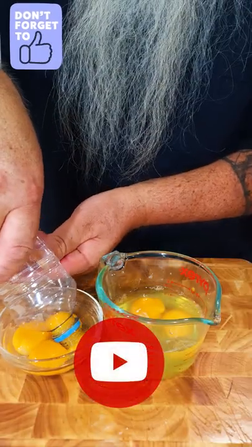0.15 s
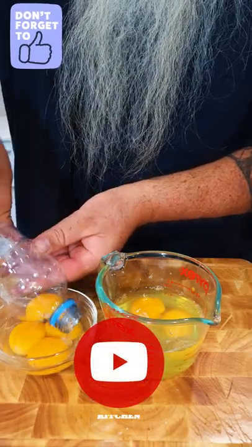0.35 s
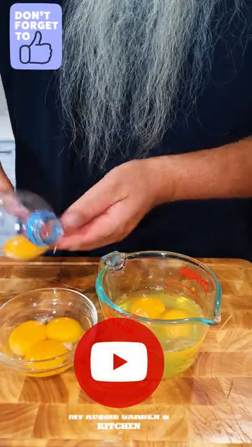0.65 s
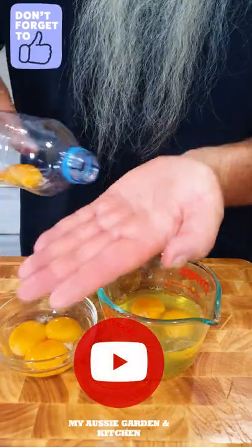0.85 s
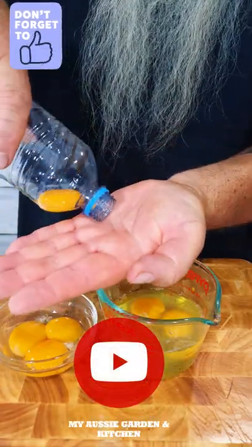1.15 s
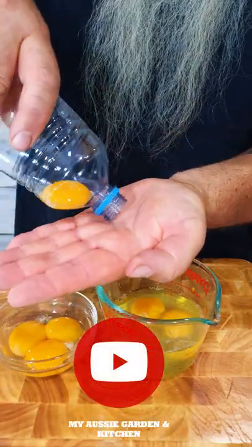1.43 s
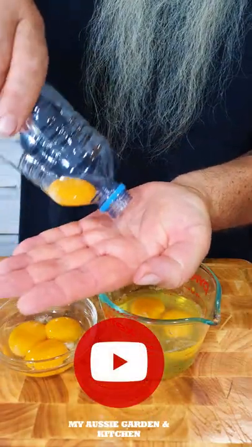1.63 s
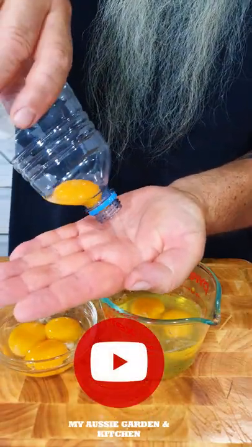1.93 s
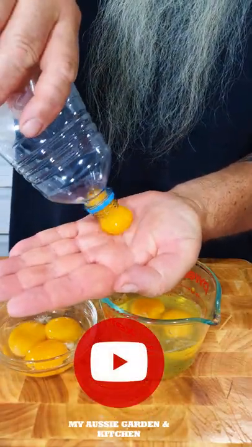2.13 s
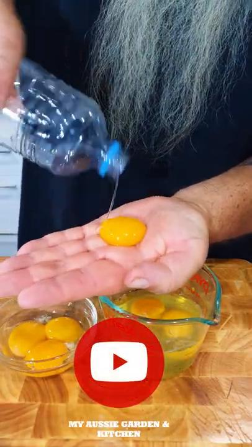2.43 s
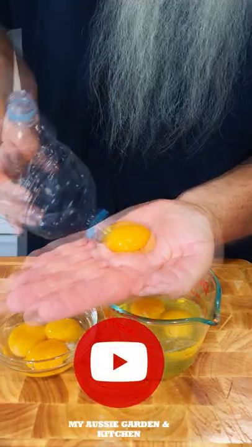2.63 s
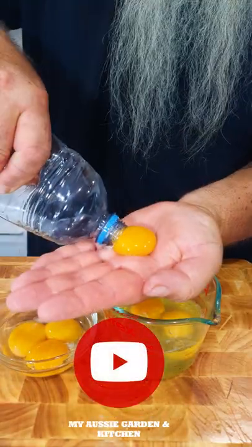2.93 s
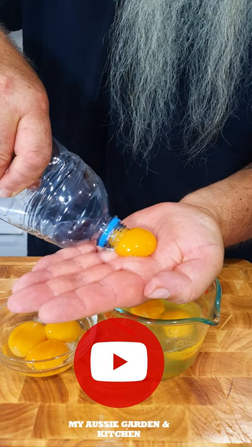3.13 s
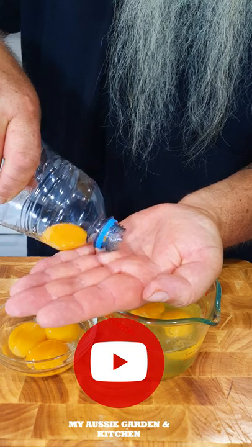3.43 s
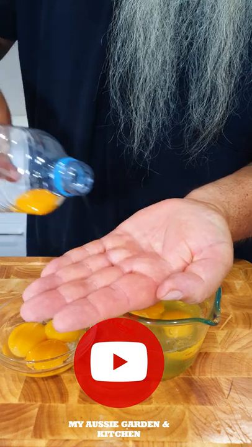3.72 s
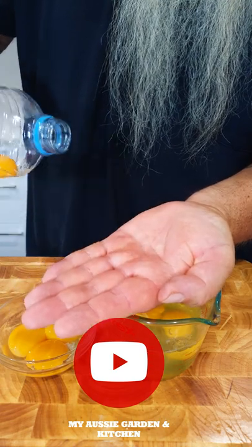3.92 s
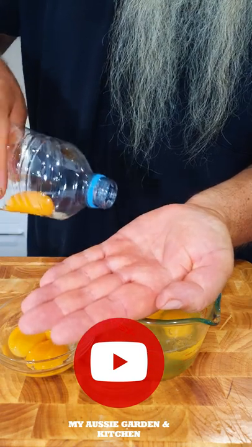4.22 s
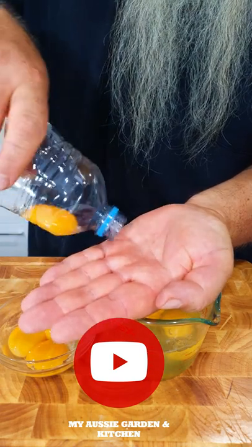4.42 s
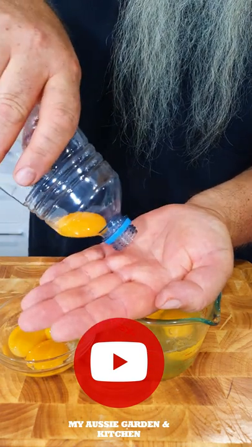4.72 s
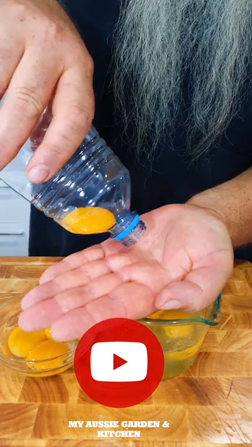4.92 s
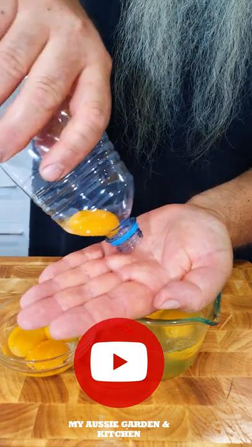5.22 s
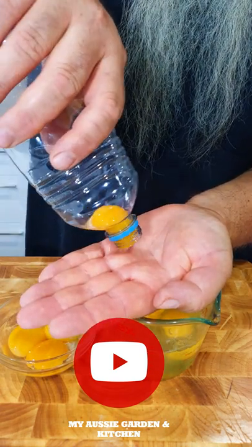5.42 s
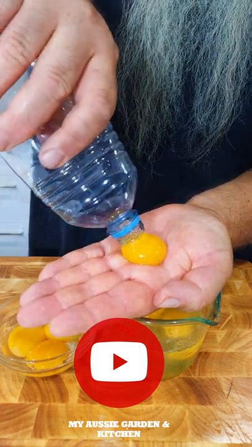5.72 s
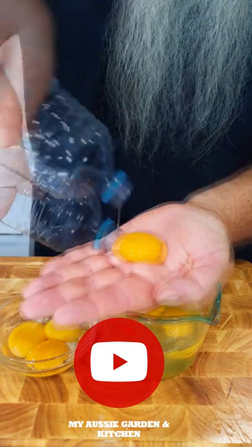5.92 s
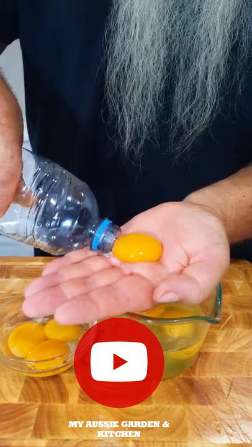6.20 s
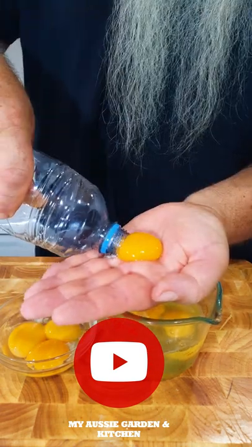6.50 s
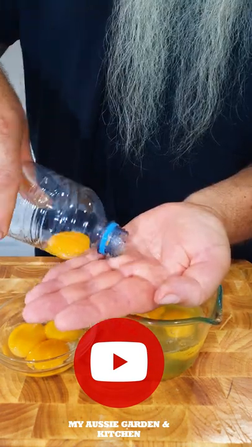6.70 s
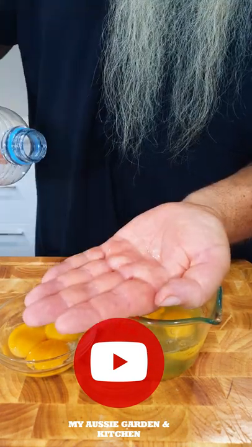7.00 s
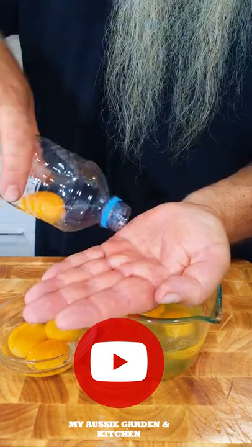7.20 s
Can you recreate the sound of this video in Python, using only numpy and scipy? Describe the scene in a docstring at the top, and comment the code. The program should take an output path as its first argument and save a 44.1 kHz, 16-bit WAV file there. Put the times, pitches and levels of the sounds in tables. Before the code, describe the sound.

A small, thin plastic bottle is squeezed and released close to the microphone in a kitchen with short, bright echoes. After a nearly quiet start, a tight flurry of sharp cracks and hollow plastic pops runs from 0.15 to 0.5 seconds. Another group snaps at 1.2 to 1.55, then lighter, brittle clicks at 2.0 to 2.45. From 3.15 to 3.55 the wall rustles and crackles strongly, with soft low thuds. A single loud hollow pop with a low boom lands at 4.15, followed by weaker knocks around 4.35. Only faint ticks at 5.2 and 5.65 break the pause. A thin, bright crinkle comes at 5.9 to 6.2, then a final rapid cluster of dry snaps at 6.65 to 6.77. Faint, wavering hum and soft hush continue throughout, dipping slightly in pitch around 2.6 and jumping higher after 5.9, where echoes become shorter.

```python
"""Thin plastic bottle in a small kitchen

A bottle is squeezed and let go; each buckle snaps a crease and rings a panel, the whole wall and the air inside.
The microphone hears it direct, with the room's noise-like echoes 5.5 to 6.5 dB behind what is sent to them.
Creeping wall adds rustle and ticks, contents and air add thuds. Behind lie a wavering hum and filtered-noise
hush. Twice the pitch of hum, hush and bottle modes steps, and the room's decay with it."""
import sys
import numpy as np
from scipy import signal
from scipy.fft import rfft, irfft
from scipy.io import wavfile
from scipy.ndimage import uniform_filter1d

SR = 44100
rng = np.random.default_rng(int(sys.argv[2]) if len(sys.argv) > 2 else 0)


def unload_wav(signal):
    """Save mono or channel-first audio to the path in sys.argv[1] as 16-bit WAV at rate SR, clipped to [-1, 1]."""
    wavfile.write(
        sys.argv[1],
        SR,
        np.round(np.clip(np.atleast_2d(signal).T, -1, 1) * 32767).astype(np.int16),
    )


N = 324135

# Steady hum of the place. Each row: partial in Hz at pitch factor 1, level in dB rms.
HUM_PARTIALS = [(113, -72.5), (189, -71.5), (382, -78), (444, -76.5), (473, -67.5), (571, -77.5),
                (1325, -83)]
# Level of the room's hush over time. Each row: time in seconds, level in dB rms.
HUSH_LEVEL = [(0, -58), (1.0, -63.5), (1.45, -57.5), (2.3, -61.5), (2.9, -63), (3.7, -56), (4.5, -62),
              (5.1, -57.5), (5.8, -61), (6.6, -62), (7.35, -60.5)]
# Spectrum of the hush. Each row: frequency in Hz at pitch factor 1, relative density in dB per Hz.
HUSH_SPECTRUM = [(28, -34), (42, -28), (57, 0), (110, -2.5), (280, -3.5), (520, -4.5), (950, -12.5),
                 (2400, -23.5), (4400, -27), (5800, -35), (15000, -31)]
# Stretches of the take. Each row: start in seconds, room level in dB, factor on the echo times, bend of decay.
STRETCHES = [(0, -5.5, 1.14, 0.9), (2.618, -6.5, 1.16, 1.3), (5.878, -6, 0.57, 1.76)]
# Pitch of hum, hush and bottle modes. Each entry: the factor in one stretch.
PITCH_FACTORS = [1.103, 1, 1.776]
# Buckles of the wall. Each row: time in seconds, panel pitch in Hz, then relative levels in dB of
# crease snap, wall and air thump.
BUCKLES = [(0.1606, 715, -77, -55.5, -41), (0.2652, 3480, -35, -37, -20), (0.2715, 1426, -17.5, -13.5, -46),
           (0.2805, 1480, -47, -28, -22), (0.313, 2100, -34.5, -29.5, -32),
           (0.3982, 1380, -15.5, -12.5, -35), (0.4049, 8400, -14, -14, -49),
           (0.439, 3020, -21.5, -24.5, -37), (0.4559, 8700, -3.5, -8, -18.5), (0.464, 4800, -20, -12, -47),
           (0.4804, 8280, -16, -21.5, -47.5), (1.2124, 1004, -53, -28, -24.5), (1.255, 2155, -41, -29, -31),
           (1.3077, 2130, -28.5, -28, -21), (1.3113, 4110, -18, -24, -18), (1.5019, 302, -28.5, -30, -17),
           (1.5319, 9090, -7, -43, -33), (1.5413, 5970, -16, -14.5, -26), (2.0198, 390, -64, -46.5, -38),
           (2.0378, 1600, -56.5, -48, -32.5), (2.0521, 885, -63, -35, -28.5),
           (2.059, 5270, -18, -14.5, -21.5), (2.0687, 900, -26, -22.5, -29), (2.1133, 8740, -9.5, -15, -26),
           (2.2192, 496, -63, -40.5, -50.5), (2.42, 882, -46.5, -26, -57.5), (2.433, 9120, -7.5, -10, -40),
           (2.4474, 6200, -17.5, -35, -29.5), (2.54, 2420, -44.5, -51, -61),
           (2.6019, 2100, -53.5, -60.5, -58.5), (3.1543, 8980, -42.5, -54.5, -52),
           (3.1661, 2050, -10, -17, -39), (3.3286, 700, -42, -31, -38), (3.346, 1040, -44, -30.5, -34),
           (3.3515, 3656, -34, -24, -42), (3.3628, 6800, -14.5, -27, -27), (3.39, 3550, -11.5, -16, -20),
           (3.4628, 4020, -11, -14.5, -33), (3.525, 280, -47, -28.5, -41),
           (3.5332, 2070, -37.5, -22.5, -25), (3.5668, 770, -46.5, -37.5, -43.5),
           (4.1483, 1260, -7.5, -8.5, -18.5), (4.3392, 2550, -40, -30.5, -28.5),
           (4.375, 521.6, -43.5, -30.5, -32.5), (5.2134, 1460, -42, -33, -39),
           (5.6467, 3110, -53, -42, -41), (5.819, 300, -70.5, -60.5, -39.5), (5.9083, 1380, -46, -37, -44),
           (5.9137, 1213, -28, -20, -50), (5.9164, 4400, -18.5, -21, -36), (5.9593, 3830, -25, -21.5, -45),
           (5.9854, 3360, -17, -33, -48), (6.0528, 5700, -14, -57, -50), (6.1001, 3830, -31, -41, -54),
           (6.108, 1420, -54, -31, -59), (6.1183, 4000, -19.5, -23, -57), (6.1449, 4270, -37, -29, -39),
           (6.2137, 4276, -29.5, -45.5, -36), (6.657, 1430, -24, -14.5, -27),
           (6.6727, 9000, -31.5, -43, -38), (6.6873, 1050, -16.5, -21, -24), (6.689, 7050, -17.5, -28, -32),
           (6.7073, 4350, -12, -33, -50), (6.7161, 6240, -12.5, -23, -17), (6.7337, 3400, -11, -16.5, -51),
           (6.7383, 3260, -9.5, -32.5, -42.5), (6.7444, 1400, -25.5, -23, -50.5),
           (6.7634, 3270, -19, -51.5, -52)]
# Spectrum of a crease. Each row: frequency in Hz, relative density in dB per Hz.
CREASE_SPECTRUM = [(1800, -6.5), (3500, -0.9), (6000, -1.5), (9000, -3.5), (12000, -4), (15500, -10)]
# The wall flexing, at pitch factor 1. Each row: mode in Hz, relative level in dB, 60 dB decay in seconds.
WALL_MODES = [(670, -4.5, 0.014), (820, -2, 0.022), (930, -3, 0.0096), (1140, -5.5, 0.023),
              (1380, -1.26, 0.0064), (1480, -0.5, 0.014), (1684.5, -4.5, 0.014), (2120, 3, 0.0074),
              (2410, -3, 0.01), (3000, -6, 0.0037), (4300, -6, 0.0066)]
# Air in the bottle and its neck, at pitch factor 1. Each row: mode in Hz, relative level in dB,
# 60 dB decay in seconds.
AIR_MODES = [(125, -14, 0.011), (246, -5.5, 0.039), (326, -4, 0.036), (420, -2, 0.033), (520, 4, 0.031)]
# Colour of the room's answer. Each row: frequency in Hz, relative level in dB.
ECHO_COLOUR = [(100, -11), (300, -6.5), (1000, 2.5), (3000, 3), (8000, 1), (15000, 1.5)]
# Echo times before the stretch's factor. Each row: frequency in Hz, 60 dB decay in seconds.
ECHO_T60 = [(150, 0.9), (500, .24), (2000, 0.18), (6000, 0.19), (15000, 0.17)]
# The wall creeps before it gives. Each row: moment it gives in seconds, rustle just before in dB rms,
# rise in dB per second.
CREEPS = [(3.36, -32, 329.5), (6.052, -48, 599.5)]
# Soft low knocks of the contents and booms of the enclosed air. Each row: time in seconds, pitch in Hz,
# level in dB before the band-pass, 60 dB decay in seconds.
THUDS = [(3.35, 100, -27, 0.039), (3.528, 148, -34.5, 0.1), (4.149, 318, -25, 0.2), (4.149, 252, -27, 0.17),
         (4.339, 282, -37, 0.081), (4.375, 319, -26, 0.085)]

PANEL_T60_S = 0.008   # for a 1 kHz panel; higher panels die sooner
PANEL_DB = 4.5   # panel peak over the stronger of the crease and wall entries
PANEL_TO_ROOM_DB = -4.5
WALL_FOCUS_DB, CREASE_FOCUS_DB = 2.5, 2   # fall per octave away from the panel's pitch
RADIATE_HZ, CUTOFF_HZ = 170, 17000
TICK_DB, TICK_SPREAD_DB, TICK_LEAD_S = 5, 2, 0.11   # over the rustle, either way, earliest before giving


def amp(db):
    """Decibels to gain."""
    return 10 ** (np.asarray(db) / 20)


def at_hz(points, hz):
    """Reads (Hz, value) points on a log-frequency axis."""
    f, v = np.transpose(points)
    return np.interp(np.log(np.maximum(hz, 1)), np.log(f), v)


def in_time(rows):
    """Turns a (seconds, dB) curve into a gain per sample."""
    s, db = np.transpose(rows)
    return amp(np.interp(np.arange(N) / SR, s, db, left=-120, right=db[-1]))


def coloured(spectrum, size):
    """Noise with the given spectrum, rms 1."""
    hz = np.arange(size // 2 + 1) * SR / size
    white = rfft(rng.standard_normal(size))
    noise = irfft(white * amp(at_hz(spectrum, hz)), size)
    return noise / noise.std()


def hum(pitch, waver_hz=2.5):
    """Steady partials of constant level, each wandering a little in frequency."""
    t, out = np.arange(N) / SR, 0
    for hz, db in HUM_PARTIALS:
        waver = np.interp(t * 40, np.arange(300), rng.standard_normal(300))   # 40 new values a second
        phase = 2 * np.pi * np.cumsum(pitch * hz + waver_hz * waver) / SR
        out = out + amp(db) * np.sqrt(2) * np.sin(phase)
    return out


def hush(pitch):
    """Background noise whose whole spectrum moves with the pitch factor and whose level drifts."""
    spectrum = [(pitch * hz, db) for hz, db in HUSH_SPECTRUM]
    return in_time(HUSH_LEVEL) * coloured(spectrum, N)


def ring(x, hz, t60):
    """A damped resonance: a unit click sets a sine of height 1 ringing."""
    r, w = amp(-60 / (t60 * SR)), 2 * np.pi * hz / SR
    return signal.lfilter([0, np.sin(w)], [1, -2 * r * np.cos(w), r * r], x + 1e-18)


def burst(fall, near_hz):
    """Noise under a fall, broad colour evened to a crease's near a panel; same energy as the fall."""
    spectrum = rfft(rng.standard_normal(len(fall)) * fall)
    broad = np.sqrt(uniform_filter1d(np.abs(spectrum) ** 2, size=25))
    hz = np.maximum(np.arange(len(spectrum)), 1) * SR / len(fall)
    colour_db = at_hz(CREASE_SPECTRUM, hz) - CREASE_FOCUS_DB * np.abs(np.log2(hz / near_hz))
    noise = irfft(spectrum / broad * amp(colour_db), len(fall))
    return noise * np.sqrt(np.sum(fall ** 2) / np.sum(noise ** 2))


def snaps(buckles, snap_s=0.00041, after_db=-14, after_s=0.0045):
    """A crease gives a very short bright burst and a weaker crackle; the panel beside it rings."""
    size, lead = 2048, 256   # samples; the lead leaves room for a steep fade-in
    creases, panels, t = np.zeros(N + size), np.zeros(N + size), np.arange(size) / SR
    late = np.maximum(t - lead / SR, 0)
    snap, crackle = np.exp(-late / snap_s), amp(after_db) * np.exp(-late / after_s)
    fall = (t >= lead / SR) * (snap + crackle)
    edge = np.clip(t * SR / lead, 0, 1) ** 24
    for s, panel_hz, crease_db, wall_db, _ in buckles:
        # the panel flips over in half a cycle
        push = np.sin(np.pi * np.clip(late * panel_hz * 2, 0, 1)) ** 2
        panel_t60 = PANEL_T60_S / np.sqrt(panel_hz / 1000)
        panel = ring(push * rng.choice([-1, 1]), panel_hz, panel_t60)
        panel_gain = amp(max(crease_db, wall_db) + PANEL_DB)
        at = int(s * SR) - lead
        creases[at:at + size] += amp(crease_db + 4.0) * burst(fall, panel_hz) * edge
        panels[at:at + size] += panel_gain * panel / np.abs(panel).max()
    return creases[:N], panels[:N]


def body(start, near_hz, modes, level_db, focus_db, spread_db, smear_s, soft_hz):
    """Each buckle strikes every mode, varied in strength and delay, less by focus_db per octave off its pitch."""
    out = np.zeros(N)
    direction = rng.choice([-1, 1], len(start))
    for k, (hz, db, t60) in enumerate(modes):
        draw, clicks = rng.standard_normal((len(start), 2)), np.zeros(N)
        at = ((start + smear_s * np.abs(draw[:, 0])) * SR).astype(int)
        off_pitch_db = focus_db * np.abs(np.log2(hz / near_hz))
        strength_db = level_db + db - off_pitch_db + spread_db * draw[:, 1]
        np.add.at(clicks, at, amp(strength_db) * direction * (-1) ** k)
        out += ring(clicks, hz, t60)
    return signal.sosfilt(signal.butter(4, soft_hz, fs=SR, output="sos"), out)


def pitched(start, near_hz, modes, level_db, soft_hz, **blow):
    """Bottle modes scaled in frequency, and inversely in decay, by each stretch's pitch factor."""
    stretch = np.searchsorted([row[0] for row in STRETCHES], start) - 1
    out = np.zeros(N)
    for k, pitch in enumerate(PITCH_FACTORS):
        now = stretch == k
        scaled = [(hz * pitch, db, t60 / pitch) for hz, db, t60 in modes]
        out += body(start[now], near_hz[now], scaled, level_db[now], soft_hz=soft_hz * pitch, **blow)
    return out


def room(stretch, bend, onset_s=0.0031):
    """Dense echoes: half-octave noise bands that build up quickly and die at their own rate; energy 1."""
    t, out = np.arange(int(0.45 * SR)) / SR, 0
    for hz in 125 * 2.0 ** np.arange(0, 7.5, 0.5):
        edges = [hz / 2 ** 0.25, hz * 2 ** 0.25]
        band = signal.butter(2, edges, "band", fs=SR, output="sos")
        decay_db = 60 * (t / (stretch * at_hz(ECHO_T60, hz))) ** bend
        fall = amp(at_hz(ECHO_COLOUR, hz) - decay_db)
        out = out + signal.sosfilt(band, rng.standard_normal(len(t))) * fall
    out = out * (1 - np.exp(-(t / onset_s) ** 2))
    return out / np.sqrt(np.sum(out ** 2))


def creep():
    """A rustle of crease-coloured noise that swells steadily until the wall gives, then stops."""
    t = np.arange(N) / SR
    swell = sum(amp(db - rise * np.abs(s - t)) * (t < s) for s, db, rise in CREEPS)
    return swell * coloured(CREASE_SPECTRUM, N)


def ticks(count=7):
    """Small buckles at random moments while the wall creeps, tending to grow; rows as in BUCKLES."""
    rows = []
    for s, db, rise in CREEPS:
        for early, pitch, size in rng.random((count, 3)):
            lead = TICK_LEAD_S * early
            # ticks grow half as fast as the rustle
            level = db + TICK_DB - 0.5 * rise * lead + TICK_SPREAD_DB * (2 * size - 1)
            rows.append((s - lead, 3000 * 2.5 ** pitch, level, level - 3.5, level - 19))
    return rows


def thuds():
    """Contents and enclosed air: clicks set damped low cycles ringing, band-passed to soften them."""
    out = np.zeros(N)
    for s, hz, db, t60 in THUDS:
        push = np.zeros(N)
        push[int(s * SR)] = amp(db)
        out += ring(push, hz, t60)
    return signal.lfilter(*signal.butter(2, [70, 500], "band", fs=SR), out)


def scene():
    """Bottle heard direct, its room answer and the background, stretch by stretch."""
    buckles = list(BUCKLES) + ticks()
    at, near_hz, _, wall_db, air_db = np.transpose(buckles)
    creases, panels = snaps(buckles)
    wall = pitched(at, near_hz, WALL_MODES, wall_db, 5060,
                   focus_db=WALL_FOCUS_DB, spread_db=2.0, smear_s=0.0003)
    air = pitched(at, near_hz, AIR_MODES, air_db - 8.5, 1000, focus_db=0, spread_db=4.0, smear_s=0.001)
    bottle = creases + wall + air + creep()
    # a small thin bottle radiates no deep bass
    radiate = signal.butter(4, RADIATE_HZ, "high", fs=SR, output="sos")
    bottle, panels = signal.sosfilt(radiate, [bottle, panels])
    # a panel beams forward, less of it fills the room
    sent = bottle + amp(PANEL_TO_ROOM_DB) * panels
    t, out = np.arange(N) / SR, bottle + panels + thuds()
    ends = [row[0] for row in STRETCHES[1:]] + [N / SR]
    for (start, room_db, stretch, bend), end, pitch in zip(STRETCHES, ends, PITCH_FACTORS):
        now = (t >= start) & (t < end)
        out += amp(room_db) * signal.fftconvolve(sent * now, room(stretch, bend))[:N]
        # the background crossfades over 2000 samples
        present = uniform_filter1d(now * 1.0, size=2000, mode="nearest")
        out += present * (hum(pitch) + hush(pitch))
    return out[None]


def record(dry):
    """The loudest peaks are rounded off, the microphone drops the deepest bass, the top is cut."""
    rounded = dry / (1 + np.abs(dry / 0.62) ** 4) ** 0.25
    no_rumble = signal.sosfilt(signal.butter(2, 45, "high", fs=SR, output="sos"), rounded)
    return signal.sosfilt(signal.cheby2(14, 80, CUTOFF_HZ, fs=SR, output="sos"), no_rumble)


dry = scene()
out = record(dry)
unload_wav(out)
```